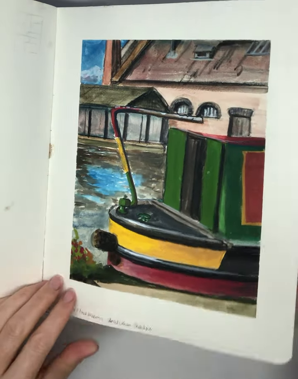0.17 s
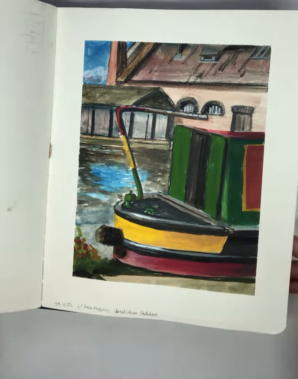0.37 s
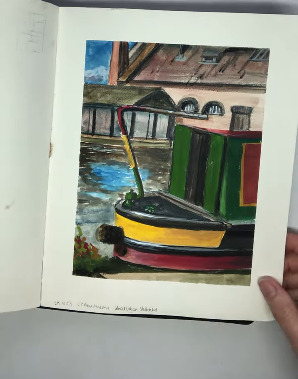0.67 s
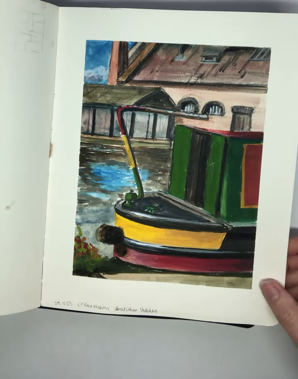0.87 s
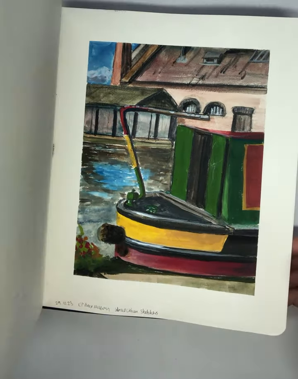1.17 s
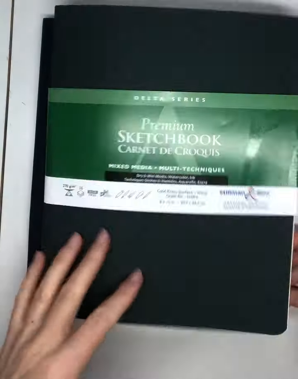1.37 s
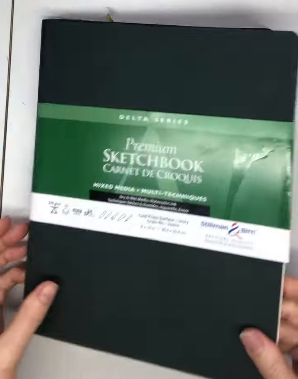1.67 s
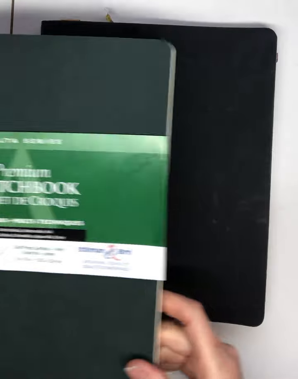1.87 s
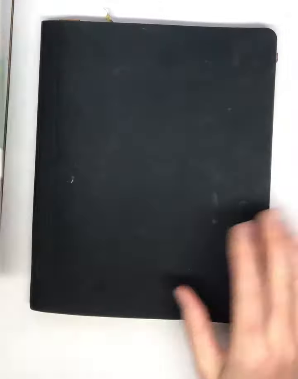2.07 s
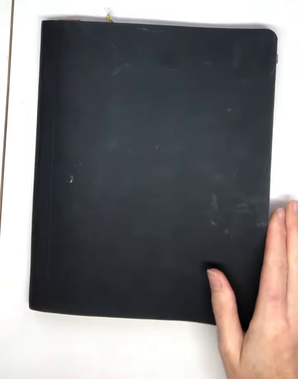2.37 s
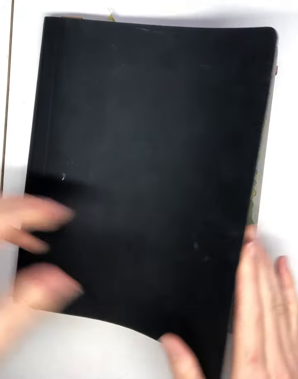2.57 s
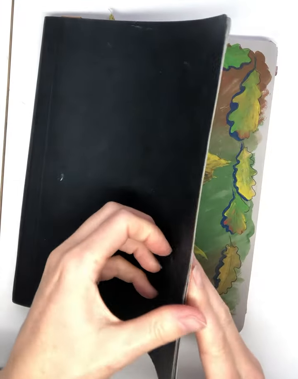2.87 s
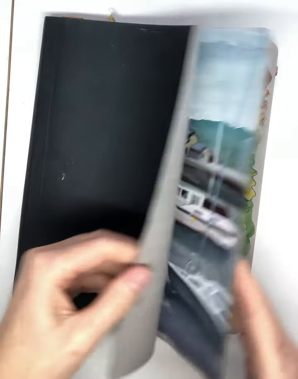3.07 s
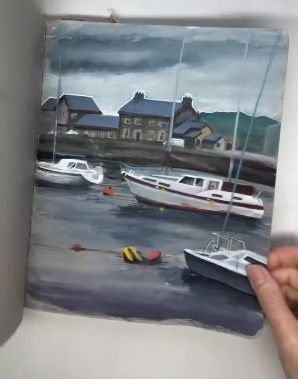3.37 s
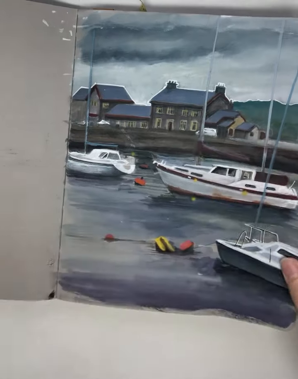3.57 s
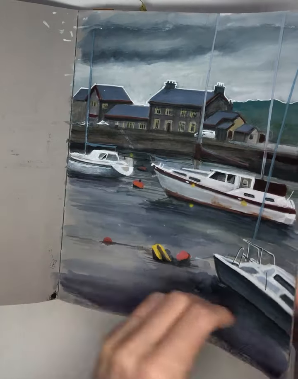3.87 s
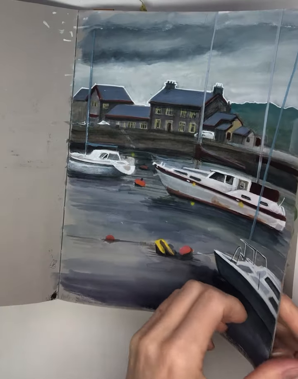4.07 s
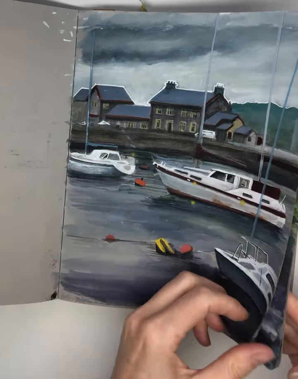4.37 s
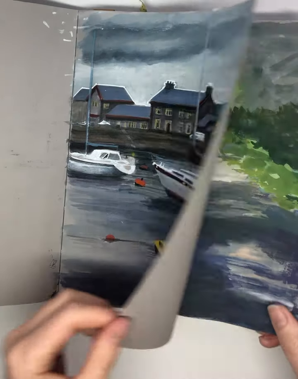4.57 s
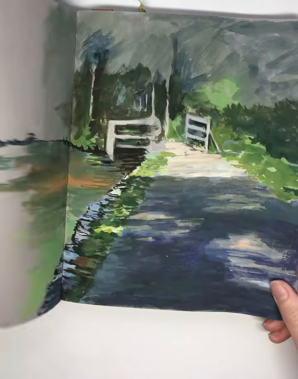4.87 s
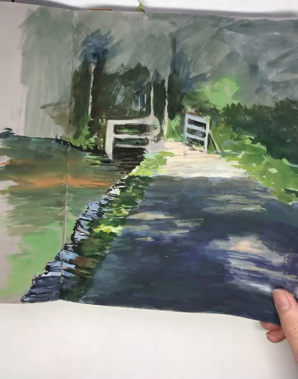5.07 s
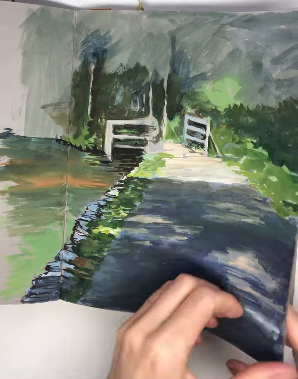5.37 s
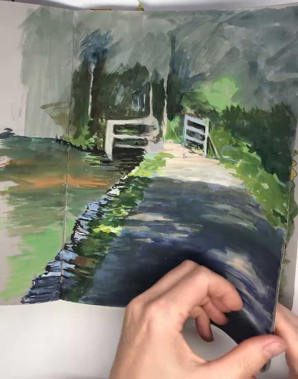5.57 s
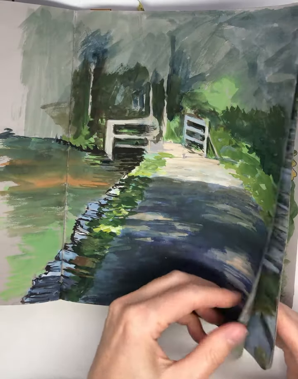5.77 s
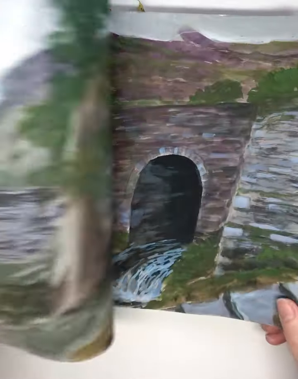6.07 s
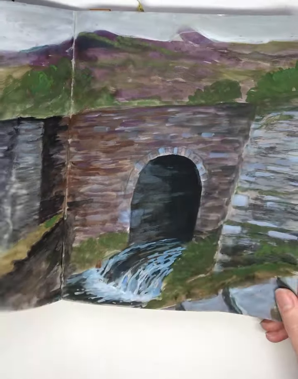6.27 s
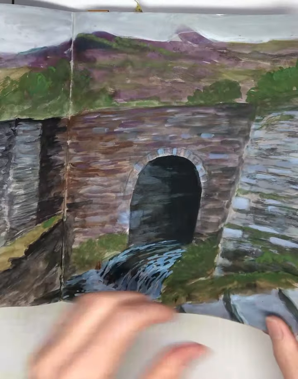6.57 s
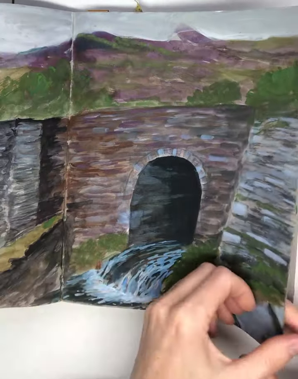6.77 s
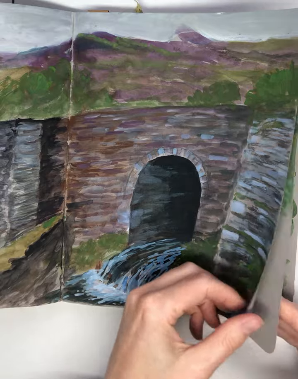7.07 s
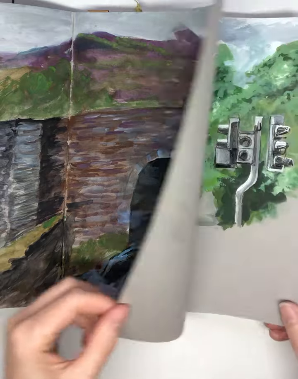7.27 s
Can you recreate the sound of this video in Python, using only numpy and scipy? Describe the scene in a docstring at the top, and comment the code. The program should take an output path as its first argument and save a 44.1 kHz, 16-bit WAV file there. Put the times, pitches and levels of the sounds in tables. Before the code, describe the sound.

Close to the microphone in a small quiet room, a stiff page flaps and a bright, loud sheet scrape rushes past at once. Books are slid and handled with scuffs and light knocks, then one lands with a hard low thump on the desk. After that, thick pages are gripped, rubbed softly and turned one by one, each with a short scrape, crackle and papery flap, quiet gaps between.

```python
"""Heavy sketchbook pages are gripped, slid and turned close to the microphone, on a desk in a quiet small room.
Rubbed and flexed sheets are showers of uneven clicks ringing in resonances; stretched patches sing as gliding
noise bands. Stiff paper buckles with a crack and a short flap that shakes the book; small ticks are bursts of grit.
A book is set down: the desk below thuds and rumbles in low noise. A short echo and the air of the room surround it."""
import sys
import numpy as np
from scipy import signal
from scipy.fft import rfft, irfft, next_fast_len
from scipy.io import wavfile
from scipy.ndimage import uniform_filter1d

SR = 44100
rng = np.random.default_rng(int(sys.argv[2]) if len(sys.argv) > 2 else 0)


def amplitude_ratio(level_db):
    """Convert a level in decibels to the matching linear amplitude (field) ratio."""
    exponent = np.asarray(level_db, float) / 20
    return 10 ** exponent


def pcm_store(signal):
    """Save signal as 16-bit PCM."""
    levels = np.round(np.clip(np.atleast_2d(signal), -1, 1) * 32767)
    wavfile.write(sys.argv[1], SR, levels.astype(np.int16).T)


N = 326781  # length in samples

# Broad resonances of a sheet. Each row: centre in Hz, width in Hz, relative level in dB.
SHEET = [(1260, 770, -2.5), (1970, 630, 5), (2726, 700, 7), (4025, 1850, 8.5), (6540, 2370, 2.5),
         (9490, 3700, -11.5), (13800, 1400, -14)]


def rms_one(x):
    """Scale to unit rms."""
    return x / np.sqrt(np.mean(x ** 2) + 1e-20)


def in_time(rows):
    """Columns of a table joined by straight lines, one value a sample; the first column is seconds."""
    seconds, *columns = np.transpose(rows)
    return [np.interp(np.arange(N) / SR, seconds, column) for column in columns]


def drift(rate_hz):
    """Slow random wander of rms 1: noise through two equal low-pass poles."""
    hop = 40  # samples between drawn values
    r = np.exp(-2 * np.pi * rate_hz * hop / SR)
    white = rng.standard_normal(N // hop + 2002)
    slow = signal.lfilter([1], [1, -2 * r, r * r], white)[2000:]  # the filter has settled
    return np.interp(np.arange(N) / hop, np.arange(len(slow)), rms_one(slow))


def coloured(spectrum):
    """Steady noise of rms 1 whose density follows rows of Hz and dB, joined along log frequency."""
    hz, level_db = np.transpose(spectrum)
    log_hz = np.log(np.fft.rfftfreq(N, 1 / SR) + 1)
    shape = amplitude_ratio(np.interp(log_hz, np.log(hz), level_db))
    return rms_one(irfft(rfft(rng.standard_normal(N)) * shape, N))


def resonance(x, hz, width_hz):
    """Two-pole resonance with gain 1 on top."""
    r = np.exp(-np.pi * width_hz / SR)
    poles = [1, -2 * r * np.cos(2 * np.pi * hz / SR), r * r]
    return signal.lfilter([(1 - r * r) / 2, 0, (r * r - 1) / 2], poles, x)


def steep_ring(x, hz, width_hz):
    """A resonance with steeper skirts: a narrow one, then one three times as wide; rms 1."""
    return rms_one(resonance(resonance(x, hz, width_hz), hz, 3 * width_hz))


def stick_slip(per_s, spread_db):
    """Fibres catch and let go: dense clicks of uneven size and either sign, in clumps."""
    sizes = amplitude_ratio(spread_db * np.minimum(rng.exponential(1, N), 5)) * rng.choice([-1, 1], N)
    happens = rng.random(N) < per_s / SR
    clumps = amplitude_ratio(2.1 * drift(40))
    return sizes * happens * clumps + 1e-18


def strokes():
    """Every stroke has its own shape; the loudest sets the colour. Returns gain, brightness, flexing dB."""
    # A sheet slides free, ever louder, and stops short;
    # a row whose stop precedes its start is a short scuff that dies at once.
    # Each row: start in seconds, stop in seconds, relative rubbing level at the stop in dB,
    # brightness at the stop in dB per octave, flexing relative to rubbing at the stop in dB.
    slides = [(0.205, 0.3, -49.5, 5.5, -10), (0.292, 0.379, -32.5, 0, -9.5), (1.089, 1.172, -48, -0.5, -11),
              (1.336, 1.425, -53, 4, -6), (1.501, 1.544, -54.5, 0.5, -3.5),
              (3.043, 3.109, -57.5, -4.5, -17), (3.377, 3.453, -59.5, 1.5, -2),
              (3.565, 3.63, -52.5, 6.5, -4), (3.644, 3.686, -47.5, -4, -8.5), (4.408, 4.485, -57, 6, -9),
              (4.972, 4.956, -42.5, -8, 6), (5.016, 5.075, -50.5, 8, 0), (5.752, 5.862, -58.5, -0.5, -1.5),
              (6.305, 6.365, -48.5, 5, -9.5), (7.064, 7.2, -53.5, 3.5, -11)]
    # Fingers drag over a sheet. Each row: start in seconds, stop in seconds, relative rubbing level in dB,
    # brightness in dB per octave, flexing relative to rubbing in dB.
    drags = [(0.09, 0.158, -65.5, -6, 6.5), (0.397, 0.614, -52.5, 1, -2.5),
             (0.684, 0.788, -55, -0.5, -11.5), (0.844, 1.06, -59.5, 2, -7.5), (1.17, 1.282, -55.5, 2, -12),
             (1.747, 1.934, -63, 7.5, -6.5), (2.266, 2.414, -65, 8, -7), (2.44, 2.519, -71.5, 3.5, 21),
             (3.142, 3.285, -64, 5.5, -5.5), (3.626, 3.679, -56.5, -6, 14.5),
             (4.466, 4.757, -69.5, 4.5, -1.5), (4.962, 5.028, -63, -2.5, 8), (5.051, 5.14, -57, 6, 3.5),
             (5.16, 5.272, -68.5, 9.5, -6.5), (5.556, 5.608, -62.5, -8, -1.5),
             (5.699, 5.716, -61.5, -7.5, 0), (6.014, 6.116, -65, -0.5, -6), (6.492, 6.715, -66.5, 3, -7),
             (6.828, 6.938, -67, -7, 3)]
    # Paper rustles to rest after a grip, flap or blow. Each row: start in seconds, relative rubbing level in dB,
    # fading in dB per second, brightness in dB per octave, flexing relative to rubbing in dB.
    settles = [(0, -49, 352, -2.5, 12.5), (0.393, -46.5, 140, 2, -4.5), (0.621, -45, 150, -3, 0),
               (0.791, -57.5, 170, -4.5, 1.5), (1.42, -53.5, 600, -4, 13), (1.607, -56, 400, -0.5, -8),
               (1.682, -58, 170, -3, -10), (1.742, -50, 500, 6, -0.5), (2.19, -47.5, 380, 0.5, 1),
               (2.389, -52, 300, 2.5, 11), (2.529, -67.5, 260.5, 4, 10.5), (2.7585, -46.5, 1502, -12, 1.5),
               (2.774, -62, 88.5, -3.5, 0), (2.894, -59, 207, -3.5, -2), (3.479, -62.5, 131, 3.5, -0.5),
               (3.698, -62, 134, 2.5, 0), (3.909, -61.5, 93, 3.5, 4), (4.058, -64, 63.5, -3.5, -0.5),
               (5.399, -61.5, 93, 3, 3.5), (5.962, -65, 89, -3, 5), (6.382, -66, 261, 3, 2),
               (6.71, -58.5, 139, 0.5, 2.5), (7.205, -65.5, 22, 1.5, -8.5)]
    # Hands resting on the paper between strokes. Each row: time in seconds, relative rubbing level in dB.
    resting = [(0, -68.5), (1.07, -68), (1.3, -66), (1.9, -78), (2.2, -79.5), (2.6, -75.5), (2.95, -74.5),
               (3.0, -87), (3.07, -69), (3.3, -69), (3.82, -74), (4.24, -71), (4.35, -80.5), (4.93, -100),
               (5.15, -71), (5.36, -67), (5.63, -77), (5.9, -70.5), (6.18, -74), (6.26, -92.5), (7.0, -90),
               (7.41, -75.5)]
    resting_tilt_db, resting_flex_db = 3.0, -3.0
    grip_db_per_s, release_db_per_s = 706, 1000  # how fast a drag comes on, and a slide or drag lets go
    swell_db = 11.5  # gained over the length of a slide
    brighten_db, stiffen_db = 4.5, 1  # over a slide the tilt per octave rises and the flexing fades by these
    ease_db = 3  # a drag is this much softer at its ends

    t = np.arange(N) / SR
    shapes = []
    for start, stop, db, tilt_db, flex_db in slides:
        left = np.clip((stop - t) / (stop - start), 0, 1)  # 1 at the start, 0 at the stop
        release = release_db_per_s * np.maximum(t - stop, 0)
        level_db = db - swell_db * left - release
        shapes.append((t - start, level_db, tilt_db - brighten_db * left, flex_db + stiffen_db * left))
    for start, stop, db, tilt_db, flex_db in drags:
        onset = grip_db_per_s * np.maximum(start - t, 0)
        release = release_db_per_s * np.maximum(t - stop, 0)
        from_middle = np.clip(2 * (t - start) / (stop - start) - 1, -1, 1)
        shapes.append((t, db - onset - ease_db * from_middle ** 2 - release, tilt_db, flex_db))
    for start, db, fade, tilt_db, flex_db in settles:
        shapes.append((t - start, db - fade * (t - start), tilt_db, flex_db))

    level = in_time(resting)[0]
    bright, flex = np.full(N, resting_tilt_db), np.full(N, resting_flex_db)
    for age, db, tilt_db, flex_db in shapes:
        louder = (age >= 0) & (db > level)
        level[louder] = db[louder]
        bright[louder] = np.broadcast_to(tilt_db, N)[louder]
        flex[louder] = np.broadcast_to(flex_db, N)[louder]
    gain = signal.lfilter([.008], [1, -.992], amplitude_ratio(level))  # rounds the corners
    return gain, uniform_filter1d(bright, size=1200), uniform_filter1d(flex, size=200)


def rubbing(gain, tilt_db):
    """Slips ring the sheet: broad resonances and finer panel modes that come and go at random."""
    # Extra level of the resonances above 9 kHz. Each row: time in seconds, level in dB.
    top_treble = [(0, 4.5), (1.45, 10), (1.7, 2.5), (3.5, 3.5), (7.41, -1.5)]
    # some 40 creases a second make the slips larger for a few ms
    creases = signal.lfilter([1], [1, -.99], rng.exponential(.5, N) * (rng.random(N) < 40 / SR))
    slips = [stick_slip(per_s=9000, spread_db=2.5) * (1 + creases) for _ in range(2)]
    panels = [(hz, .06 * hz, -11.5) for hz in np.geomspace(1000, 5500, num=14)]
    out, top_db = 0, in_time(top_treble)[0]
    for k, (hz, width, db) in enumerate(SHEET + panels):
        wander_db = (1.8 if k < len(SHEET) else 5) * drift(6)
        colour_db = tilt_db * np.log2(min(hz, 9500) / 3000) + (hz > 9000) * top_db
        out = out + amplitude_ratio(db + wander_db + colour_db) * steep_ring(slips[k % 2], hz, width)
    return gain * amplitude_ratio(-11.0) * out


def flexing(gain, flex_db):
    """A bending sheet wobbles: sparser slips drive its low modes; deep bending favours the lowest."""
    # Bending modes of a flexed sheet. Each row: centre in Hz, width in Hz, relative level in dB.
    modes = [(250, 75, -13), (338.6, 230, 1.5), (470, 340, 0), (550, 120, -5), (785, 540, 10)]
    slips, out = stick_slip(per_s=3700, spread_db=1.0), 0
    depth = np.maximum(flex_db - 3.0, 0)
    for hz, width, db in modes:
        wander_db = 3 * drift(8)
        tilt_db = -1.3 * depth * np.log2(hz / 550)
        out = out + amplitude_ratio(db + wander_db + tilt_db) * steep_ring(slips, hz, width)
    return gain * amplitude_ratio(flex_db - 8.5) * out


def singing():
    """Each patch swells and fades: a gliding tone whose strength and phase wander with slow noise."""
    # A stretched patch of the sheet sings in a narrow band while it is rubbed.
    # Each row: start in seconds, stop in seconds, relative level in dB, first pitch in Hz, last pitch in Hz.
    patches = [(0.306, .388, -39.5, 1058, 1600), (0.314, 0.392, -40.5, 2834, 2640),
               (.32, 0.376, -41.5, 4690, 4520), (.92, 1.06, -63.5, 1790, 1800),
               (1.105, 1.186, -75, 1700, 2190), (.95, 1.048, -64.5, 4450, 4500),
               (1.16, 1.223, -60.5, 4440, 4900), (1.742, 1.771, -50.5, 2860, 3030),
               (1.744, 1.754, -47.5, 3880, 4030), (2.39, 2.453, -51.5, 3000, 2960),
               (2.47, 2.526, -51, 960, 1074), (3.616, 3.63, -48, 800, 760), (3.655, 3.682, -56, 794, 920),
               (4.462, 4.486, -57.5, 4150, 3960), (5.056, 5.074, -55.5, 3600, 2920),
               (7.051, 7.138, -61.5, 929, 1162), (7.106, 7.173, -63, 3620, 4010)]
    width_share = 0.11  # bandwidth of each wander pole as a share of the first pitch
    out, white = np.zeros(N), rng.standard_normal((2, N))
    for start, stop, db, from_hz, to_hz in patches:
        at = slice(round(start * SR), round(stop * SR))
        along = np.linspace(0, 1, at.stop - at.start)
        phase = 2 * np.pi * np.cumsum(from_hz + (to_hz - from_hz) * along) / SR
        r = np.exp(-np.pi * width_share * from_hz / SR)
        a, b = rms_one(signal.lfilter([1], [1, -2 * r, r * r], white[:, at]))
        swell = np.sin(np.pi * along) ** 0.26 * (.7 + 0.53 * along)
        out[at] += amplitude_ratio(db) * swell * (a * np.cos(phase) + b * np.sin(phase))
    return out


def snaps():
    """A crack leads; the flap swells over a few cycles, sinks in pitch, stops short and shakes the book."""
    # Buckles and knocks. Each row: start in seconds, flap envelope peak in dB, pitch the flap sinks to in Hz, #
    # relative crack level in dB, flap length in cycles (it peaks half way; that half is kept within 1.2 to 5
    # cycles).
    buckles = [(0.002, -26, 730, -65, 1.38), (0.282, -34.5, 990, -50, 6.4), (0.284, -38.5, 574, -58, 4.1),
               (0.621, -28.5, 1840, -28.5, 12), (0.651, -39.5, 640, -70, 4.3), (0.798, -48, 304, -60, 2.1),
               (1.422, -40, 606, -44, 2.3), (1.776, -48.5, 745, -73, 4.6), (2.19, -37, 1220, -40, 2.7),
               (2.192, -37, 590, -70, 3.7), (2.3913, -12.5, 470, -35, 1.7), (2.406, -28.5, 250, -60, 3.7),
               (2.461, -37, 246, -74, 5.4), (2.465, -33.5, 630, -47.5, 2.3),
               (2.7589, -40.5, 673, -38.5, 1.9), (3.192, -49, 836, -64.5, 5.5),
               (3.609, -39, 794, -44.5, 5.7), (3.629, -31.5, 778, -76, 6.6), (3.642, -39, 810, -31.5, 7),
               (3.9135, -44.5, 810, -40, 6), (4.548, -56, 630, -75, 4.8), (4.9605, -24.5, 1180, -33.5, 1.7),
               (4.974, -36, 632, -73.5, 2.6), (4.989, -40.5, 740, -66, 5), (5.068, -36.5, 2400, -30.5, 1.6),
               (5.073, -31, 747, -55, 5.7), (5.081, -42, 675, -60, 3.4), (5.393, -32, 750, -38, 1.5),
               (5.964, -47, 631, -82, 3.4), (6.368, -35, 860, -45, 5.5), (6.375, -36.5, 706, -63.5, 5),
               (6.71, -34.5, 707, -42.5, 1.9), (7.26, -55.5, 483, -81, 1.8)]
    # Resonances of the book. Each row: pitch in Hz, relative level in dB,
    # relative ring time in seconds (a 60 dB fall takes about 0.69 of it).
    book = [(117.4, -27, 0.45), (236, -29, 0.26), (321, 5.5, 0.059), (460, 5.5, 0.033), (640, -5, 0.045),
            (860, -16, 0.028)]
    t = np.arange(round(.06 * SR)) / SR
    cracks, pats, flaps = np.zeros((3, N + len(t)))
    noise = rng.standard_normal((len(buckles), len(t)))
    for (s, flap_db, hz, crack_db, cycles), grit in zip(buckles, noise):
        at = slice(round(s * SR), round(s * SR) + len(t))
        cracks[at] += amplitude_ratio(crack_db) * grit * np.exp(-t / .0022)
        # small stiff patches slap broadly
        pats[at] += amplitude_ratio(flap_db) * hz / 1400 * grit[::-1] * np.exp(-t / 0.003)
        age = t * hz / np.clip(cycles / 2, 1.2, 5)  # 1 at the peak of the flap
        # short bending waves run ahead
        phase = 2 * np.pi * hz * (t + 0.0013 * (1 - np.exp(-t / 0.00074)))
        flaps[at] += amplitude_ratio(flap_db) * age ** 2 * np.exp(1 - age ** 2) * np.sin(phase)
    cracks, pats, flaps = cracks[:N], pats[:N], flaps[:N]
    ringing = sum(amplitude_ratio(0.48 * db) * resonance(cracks, hz, width) * (-1) ** k
                  for k, (hz, width, db) in enumerate(SHEET))
    slaps = signal.sosfilt(signal.butter(3, [600, 3300], "band", fs=SR, output="sos"), pats)
    body = sum(amplitude_ratio(db + 26.5) * resonance(flaps + 1e-18, hz, 3.2 / ring_s) * ring_s
               for hz, db, ring_s in book)
    return ringing + slaps + flaps + body


def ticks():
    """A fingertip or page corner ticks on paper: a few ms of grit in one broad band."""
    # Each row: start in seconds, peak level in dB, pitch in Hz that places the band.
    taps = [(0.8997, -42, 1440), (1.222, -42, 7000), (1.26, -46, 5000), (1.454, -50, 1260),
            (1.8155, -43.5, 1330), (2.091, -53, 3500), (2.372, -39.5, 2580), (2.564, -42, 1540),
            (2.617, -49.5, 1990), (2.794, -45, 1810), (2.841, -47, 2400), (3.014, -47, 1890),
            (3.056, -50, 806), (3.236, -47, 1950), (3.358, -51.5, 2500), (3.48, -44.5, 3500),
            (3.716, -43.5, 1200), (5.425, -48, 1040), (6.744, -42.5, 1800)]
    decay_s = 0.0045  # time constant ahead of the band filter
    t, out = np.arange(round(.03 * SR)) / SR, np.zeros(N + SR)
    for (s, db, hz), grit in zip(taps, rng.standard_normal((len(taps), len(t)))):
        band = signal.butter(3, [0.22 * hz, 1.6 * hz], "band", fs=SR, output="sos")
        tick = signal.sosfilt(band, grit * np.exp(-t / decay_s))
        start = round(s * SR)
        out[start:start + len(t)] += amplitude_ratio(db) * tick / np.abs(tick).max()
    return out[:N]


def desk():
    """The desk rumbles under leaning arms; each landing weight swells fast and dies away."""
    # Spectrum of the rumble. Each row: frequency in Hz, relative density in dB.
    rumble = [(30, -18.5), (87, -14), (124, -5), (211, -11), (320, -17.5), (420, -32.5), (700, -120)]
    # Weight lands on the desk. Each row: peak time in seconds, rumble level in dB before a slow wander,
    # dying in dB per second.
    thuds = [(0.398, -40, 100), (0.818, -48.5, 250), (1.44, -53.5, 118), (1.647, -53.5, 250),
             (2.408, -41, 109), (2.479, -36.5, 181), (3.62, -59, 89), (4.979, -58.5, 74)]
    # Arms leaning on the desk. Each row: time in seconds, rumble level in dB before the wander.
    load = [(0, -59.5), (.3, -59.5), (.9, -65.5), (3.4, -72), (7.41, -73)]
    rise_db_per_s = 903
    t, level = np.arange(N) / SR, in_time(load)[0]
    for s, db, fade in thuds:
        rise = rise_db_per_s * np.maximum(s - t, 0)
        level = np.maximum(level, db - rise - fade * np.maximum(t - s, 0))
    return amplitude_ratio(level + 2 * drift(7.0)) * coloured(rumble)


def room(x):
    """Small-room echo: ten feedback delays, duller on every round, worked out on a padded frequency grid."""
    t60_s, wall_cut_hz = 0.29, 5700  # 60 dB fall in the bass; corner of the loss on each round
    size = next_fast_len(N + SR)
    w = 2 * np.pi * np.fft.rfftfreq(size)
    dull = 1 / (1 + 1j * w * SR / (2 * np.pi * wall_cut_hz))
    echoes = 0
    for k, lag_s in enumerate(rng.uniform(0.0056, 0.033, size=10)):
        once = amplitude_ratio(-60 * lag_s / t60_s) * dull * np.exp(-1j * w * lag_s * SR)
        echoes = echoes + (-1) ** k * once / (1 - once)  # all rounds of one loop
    return irfft(rfft(x, size) * echoes, size)[:N]


def room_air():
    """The quiet air of the room: steady noise, strongest in the bass."""
    # Each row: frequency in Hz, relative density in dB.
    spectrum = [(25, -11), (58, 2.5), (145, -11), (988, -6), (1610, -12), (5000, -21.5), (8360, -27),
                (16000, -29.5)]
    return amplitude_ratio(-70) * coloured(spectrum)


def scene():
    """Paper close to the microphone, its room echo, the desk and the air of the room."""
    gain, tilt_db, flex_db = strokes()
    paper = rubbing(gain, tilt_db) + flexing(gain, flex_db) + singing()
    hits = snaps() + ticks()
    echo = amplitude_ratio(-20.5) * room(hits + paper / 5)
    return (paper + hits + echo + desk() + room_air())[None]


def roll_off(x):
    """The treble ends steeply here."""
    return signal.sosfilt(signal.butter(12, 16500, fs=SR, output="sos"), x)


def record(dry):
    """A small microphone that loses the deep bass, below 38 Hz."""
    thin = signal.sosfilt(signal.butter(4, 38, "high", fs=SR, output="sos"), dry)
    return roll_off(thin)


dry = scene()
out = record(dry)
pcm_store(out)
```